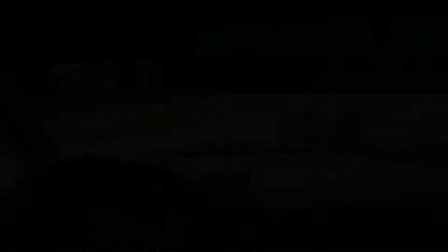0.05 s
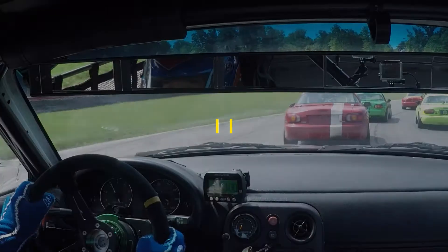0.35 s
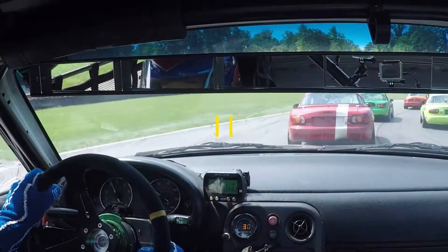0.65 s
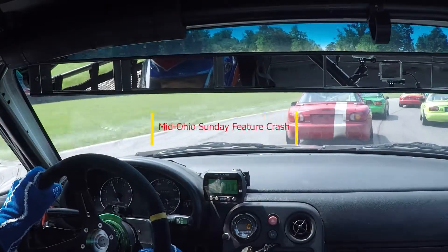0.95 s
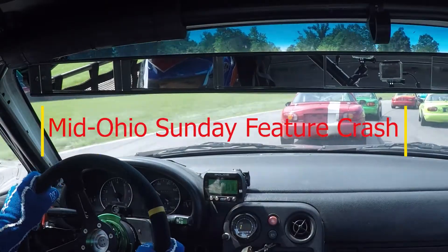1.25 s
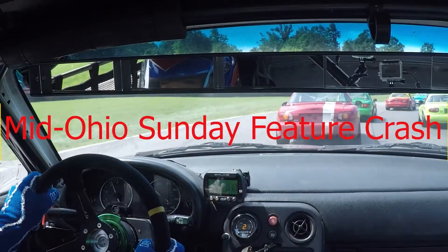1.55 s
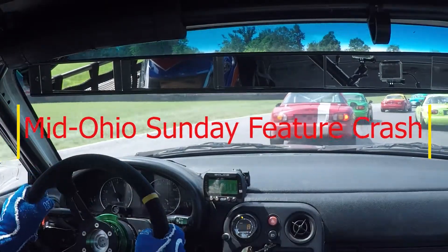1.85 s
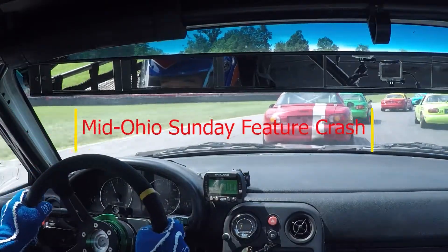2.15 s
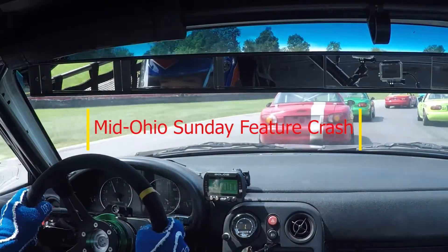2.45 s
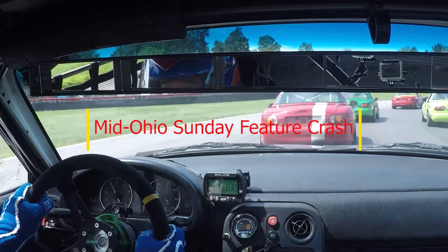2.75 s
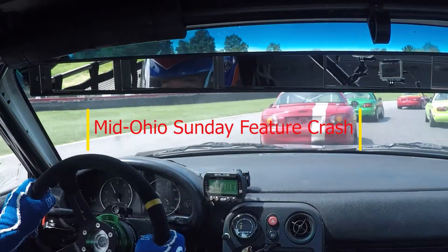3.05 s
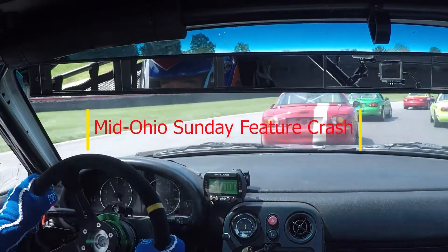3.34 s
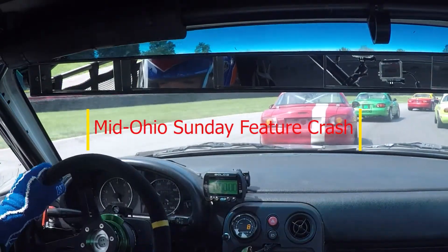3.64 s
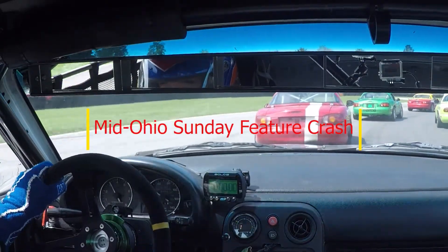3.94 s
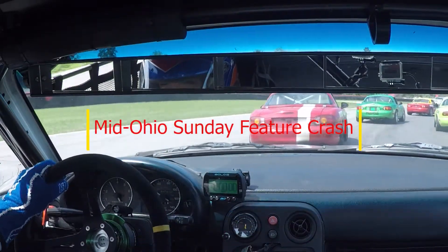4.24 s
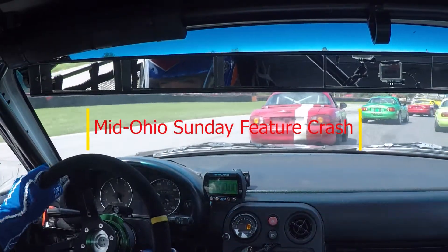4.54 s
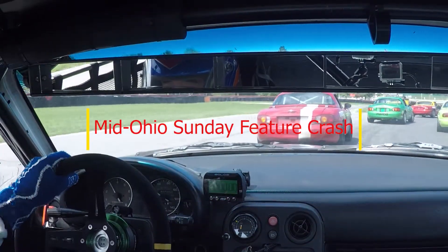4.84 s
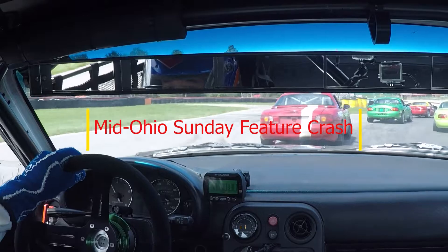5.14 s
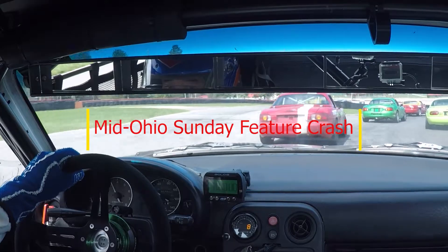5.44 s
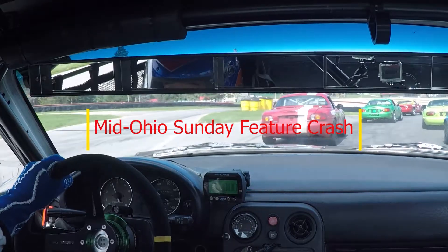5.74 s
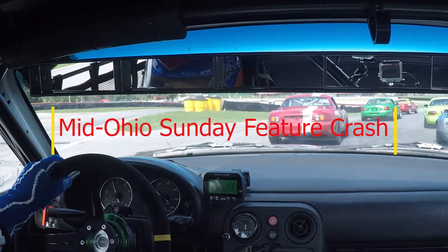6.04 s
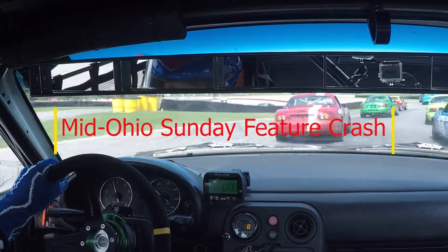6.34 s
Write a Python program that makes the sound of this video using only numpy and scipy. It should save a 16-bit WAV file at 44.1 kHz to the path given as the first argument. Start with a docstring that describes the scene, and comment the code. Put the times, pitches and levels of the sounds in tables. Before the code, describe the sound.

A four-cylinder race car engine fades in, heard from behind the driver in an open cabin. It pulls steadily, eases off, wavers through short presses of the throttle, then pulls again with slowly rising revs. The body drones and the drivetrain whines under tyre roar and low wind buffeting. Another car's engine sounds close by, a panel rasps faintly, and one sharp click comes near the end.

```python
"""A four-cylinder race car engine, heard from the cockpit while running through a bend in a pack.
Its firings make the exhaust pipe ring as it pulls, eases off, then pulls again with wavering revs.
The body drones and the drivetrain whines with the road speed, thin gear tones come and go,
and a rival's engine sings close by. Tyres roar, wind buffets the open cabin, and loose parts rattle."""
import sys
import numpy as np
from scipy import signal
from scipy.fft import rfft, irfft, next_fast_len
from scipy.io import wavfile

SR = 44100
rng = np.random.default_rng(int(sys.argv[2]) if len(sys.argv) > 2 else 0)


def to_wav(sig):
    """Store sig (one row per channel, or 1-D mono) as 16-bit WAV at the path in sys.argv[1].

    Samples outside -1..1 are clipped; the rate is SR.
    """
    pcm = np.clip(np.atleast_2d(sig), -1, 1) * 32767
    pcm = np.round(pcm).astype(np.int16)
    wavfile.write(sys.argv[1], SR, pcm.T)  # frames by channels


N = 290619
TIME = np.arange(N) / SR

# how the cabin colours road noise and drone: (frequency [Hz], relative level [dB])
CABIN_SPECTRUM = [(130, -30), (195, -14.5), (265, -3), (305, -12), (350, -11.5), (400, -4), (455, -1),
                  (520, -3), (610, -1), (750, -10), (860, -11), (950, -30), (1400, -31)]
# machinery as heard in the cabin: (frequency [Hz], relative level [dB])
WHIRR_SPECTRUM = [(700, -17.5), (950, 4.5), (1150, 3.5), (1400, 0), (1570, -1), (1850, -4), (2020, -6.5),
                  (2200, -7.5), (2400, -7), (2750, -12), (3200, -23.5), (4200, -32)]
GEAR_ATTACK_S, GEAR_RELEASE_S = .14, .11


def from_db(db):
    """Turn decibels into a gain to multiply by."""
    return 10 ** (np.asarray(db) / 20)


def rms_one(x):
    """Scale a signal to an average strength (rms) of one."""
    return x / np.sqrt(np.mean(x ** 2) + 1e-20)


def in_time(rows):
    """Join a table's points with lines: one curve for each column after the time."""
    times, *columns = np.transpose(rows)
    return [np.interp(TIME, times, column) for column in columns]


def drift(rate):
    """Smooth random wandering of about size one; a higher rate wanders faster."""
    pole = np.exp(-80 * np.pi * rate / SR)
    noise = rng.standard_normal(N // 40 + 2002)
    slow = signal.lfilter([1], [1, -2 * pole, pole * pole], noise)[2000:]
    return np.interp(np.arange(N) / 40, np.arange(len(slow)), rms_one(slow))


def colour(x, spectrum):
    """Filter a sound by a spectrum that falls away beyond its ends; rms one."""
    hz, db = np.transpose(spectrum)
    size = next_fast_len(N)
    bins_hz = np.maximum(np.fft.rfftfreq(size, 1 / SR), 1)
    gain = from_db(np.interp(np.log(bins_hz), np.log(hz), db))
    gain *= np.minimum(bins_hz / hz[0], 1) ** 2 * np.minimum(hz[-1] / bins_hz, 1) ** 2
    return rms_one(irfft(rfft(x, size) * gain, size)[:N])


def turning(hz, jitter):
    """Count the cycles of a slightly unsteady rotation."""
    return np.cumsum(hz * (1 + jitter * drift(27.7))) / SR


def partial(cycles, order, db, waver_db, lag=0):
    """One tone of wavering level; its 'order' is how often it vibrates in each cycle."""
    return np.sqrt(2) * from_db(db + waver_db * drift(10.5)) * np.cos(2 * np.pi * (order * cycles - lag))


def hum(cycles, level_db, orders, waver_db):
    """A stack of tones whose balance keeps shifting."""
    return sum(partial(cycles, k, level_db + db, waver_db, lag=rng.random()) for k, db in orders)


def spell(start, end, attack_s, release_s):
    """A gain that rises to one, holds until the end time, then falls away."""
    return np.clip((TIME - start) / attack_s, 0, 1) - np.clip((TIME - end) / release_s, 0, 1)


def bursts(rows, attack_s, release_s):
    """Several spells, each at its own level."""
    return sum(from_db(db) * spell(start, end, attack_s, release_s) for start, end, db in rows)


def clatter(cycles, size=512):
    """Meshing parts repeat a rough pattern every four cycles; three such patterns take turns."""
    place = cycles / 4 % 1 * size
    grid = np.arange(size * 8) / 8
    orders = np.arange(size // 2)
    out = 0
    for k in range(3):
        # some tones stand out, mostly even-numbered ones; the highest die away
        strength = from_db(8 * np.clip(rng.standard_normal(len(orders)), -2, 1.4) - 4 * (orders % 2))
        strength *= np.clip((orders[-1] - orders) / (size / 6), 0, 1)
        pattern = irfft(strength * np.exp(2j * np.pi * rng.random(len(orders))), len(grid))
        turn = np.cos(2 * np.pi * (.4 * TIME + k / 3))
        out += np.interp(place, grid, pattern, period=size) * (1 + 0.36 * drift(4)) * turn
    return rms_one(out)


def pulsing_noise(firings, depth):
    """Churning air that swells with each firing."""
    return rms_one(rng.standard_normal(N) * (1 + depth * np.cos(2 * np.pi * firings)))


def cabin_echoes(x, decay_s=.07, share=.35):
    """Add dense, short echoes off bare metal and glass; rms one."""
    age = TIME[:int(decay_s * SR)]
    echoes = rng.standard_normal(len(age)) * from_db(-60 * age / decay_s)
    reflected = rms_one(signal.fftconvolve(x, echoes)[:N])
    return rms_one(np.sqrt(1 - share) * x + np.sqrt(share) * reflected)


def engine(firings, firing_hz):
    """The throttle sets the exhaust's strength; tones swell as the revs carry them through resonances."""
    # presses of the pedal: (start [s], end [s], opening [1 = wide open], brightness [dB per order],
    # time to open [s], time to close [s])
    pulls = [(0, 1.545, .97, 0, .05, .025), (2.2, 2.65, .5, 0, .12, .15), (3.06, 3.52, 1.08, .5, .1, .14),
             (3.9, 4.35, .62, -3, .25, .12), (4.35, 6.3, .95, .1, .12, .25)]
    # resonances of pipe and cabin: (frequency [Hz], level [dB])
    pipe = [(405, -43), (425, -35), (450, -30.5), (500, -42.5), (565, -37), (605, -37), (660, -38),
            (705, -41.5), (755, -37), (810, -38.5), (870, -42.5), (915, -48.5), (975, -52), (1055, -48.5),
            (1150, -53)]
    # exhaust tones; unequal cylinders add the half orders: (order, relative level [dB])
    exhaust_orders = [(1, -5), (2, -5), (3, 0), (3.5, -9), (4, .5), (4.5, -8.5), (5, .5), (5.5, -7), (6, 0),
                      (6.5, -11), (7, -4.5), (8, -7), (9, -16), (10, -16), (11, -10), (12, -15), (13, -16)]
    quarter_orders = [(k, -19) for k in np.arange(3.25, 7, .5)]
    coasting_db = -16.5  # throttle shut, compared with wide open
    throttle, tilt_db = 0, 0
    for start, end, opening, brightness_db, open_s, close_s in pulls:
        pedal = spell(start, end, open_s, close_s)
        throttle += opening * pedal
        tilt_db += brightness_db * pedal
    pipe_hz, pipe_db = np.transpose(pipe)
    out = 0
    for k, db in exhaust_orders + quarter_orders:
        level_db = db + np.interp(k * firing_hz, pipe_hz, pipe_db) + coasting_db * (1 - throttle)
        level_db += tilt_db * (np.clip(k, 3, 6) - 4.5)
        # the pipe delays high tones a little, so each bark rings on
        lag = rng.random() if k % 1 else 0.0306 * k * k
        out += partial(firings, k, level_db, waver_db=1.6, lag=lag)
    return out * (1 + 0.023 * drift(53))  # no two firings are equally strong


def drone():
    """The body booms with the road speed; its overtones swell as they cross the cabin's resonances."""
    # the deep boom: (time [s], pitch [Hz], relative level [dB])
    boom = [(0.1, 105.7, -35), (0.7, 108.6, -29.5), (1.3, 108.8, -30), (1.95, 111.7, -28.5),
            (2.5, 108.4, -26.5), (2.9, 104.5, -28.5), (3.28, 103.4, -29.5), (3.45, 105.4, -38),
            (3.8, 103.7, -32.5), (4.02, 100.5, -45), (4.25, 101.4, -32), (4.9, 103.3, -30.5),
            (5.35, 107.8, -27.5), (5.75, 110.8, -25.5), (6.59, 123.3, -28)]
    # its overtones: (order, relative level [dB])
    overtones = [(2, -14.5), (3, -9.5), (4, -17.5), (5, -15.5), (6, -19), (7, -21)]
    hz, level_db = in_time(boom)
    cycles = turning(hz, jitter=0.0027)
    cabin_hz, cabin_db = np.transpose(CABIN_SPECTRUM)
    out = partial(cycles, 1, level_db + 0.39, waver_db=0.96)
    for k, db in overtones:
        resonance_db = np.interp(k * hz, cabin_hz, cabin_db)
        out += partial(cycles, k, level_db + db + resonance_db, waver_db=2.5, lag=rng.random())
    return out


def drivetrain_whine(shaft, second_db, fourth_db):
    """The spinning drivetrain whines; its fourth tone swells and fades separately."""
    # the other tones: (order, level compared with order 2 [dB])
    tones = [(1, -14.5), (2, 0), (3, -7.5), (5, -9)]
    return hum(shaft, second_db, tones, waver_db=1.0) + partial(shaft, 4, fourth_db, waver_db=2.5)


def rival():
    """The exhaust of another four-cylinder car a few lengths away."""
    # its engine: (time [s], firing rate [Hz], relative level [dB])
    rival_revs = [(0.45, 158, -54), (0.64, 157.2, -43), (0.78, 149.1, -41), (0.92, 156.2, -43),
                  (1.3, 155.6, -49), (2.1, 151.2, -53), (2.6, 153.2, -43.5), (3.0, 151.5, -46),
                  (3.7, 146.7, -52.5), (4.1, 148.8, -41), (4.33, 151.7, -41), (4.9, 161.2, -39.5),
                  (5.3, 169.9, -45.5), (5.6, 160.7, -49.5), (5.9, 157.2, -40), (6.1, 160.4, -40.5),
                  (6.28, 157.5, -40.5), (6.59, 168.5, -46)]
    # its exhaust tones: (order, relative level [dB])
    tones = [(1, -4), (2, -6), (2.5, -12.5), (3, 1), (4, 4.3), (4.5, -11), (5, -7.5)]
    hz, level_db = in_time(rival_revs)
    return hum(turning(hz, jitter=0.003), level_db - .3, tones, waver_db=1.5)


def casing_ring(shaft, hiss_db, above_hiss_db=5, width_hz=24):
    """Clatter and churning air set the gear casings ringing."""
    # narrow resonances of the casings: (frequency [Hz], relative level [dB])
    resonances = [(1570, 0.5), (1795, -1), (2365, -4), (2620, -8), (2960, -10), (3400, -9.5), (3850, -20),
                  (4280, -20.5), (4680, -15.5)]
    gain = from_db(hiss_db + above_hiss_db + 2 * drift(1.8))
    shaking = clatter(shaft) + 0.57 * rng.standard_normal(N)
    ring = 0
    for k, (hz, db) in enumerate(resonances):
        peak_filter = signal.iirpeak(hz, hz / width_hz, SR)
        ring += (-1) ** k * from_db(db) * signal.lfilter(*peak_filter, shaking)
    return gain * rms_one(ring)


def machinery(shaft, firings, spectrum, clatter_share, depth, flutter_db):
    """Repeating clatter mixes with pulsing air into a fluttering whirr."""
    mix = np.sqrt(clatter_share) * clatter(shaft)
    mix += np.sqrt(1 - clatter_share) * pulsing_noise(firings, depth)
    return colour(mix, spectrum) * from_db(flutter_db * drift(7))


def gear_hiss(shaft, firings, level_db):
    """The high part of the machinery's noise echoes around the cabin."""
    # the hiss: (frequency [Hz], relative level [dB])
    band = [(2200, -20.5), (3300, -1.5), (4100, -3), (4750, -1.5), (5600, 0.5), (6500, -7.5), (7400, -11),
            (8500, -25)]
    hiss = machinery(shaft, firings, band, clatter_share=.3, depth=.15, flutter_db=1.16)
    return from_db(level_db) * cabin_echoes(hiss)


def air_hiss(firings, level_db):
    """Churning air adds a flickering hiss at the very top."""
    # the highest treble: (frequency [Hz], relative level [dB])
    band = [(6500, -10.5), (7600, 0), (8700, 1), (9700, -2.5), (12000, 1), (14500, -5), (16000, -13.5)]
    gain = from_db(level_db + 1.1 * drift(12))
    return gain * cabin_echoes(colour(pulsing_noise(firings, depth=.15), band))


def tyre_roar(firings, level_db):
    """Tyres roar on the road, with two short surges."""
    # surges of the roar: (start [s], end [s], level [dB])
    surges = [(1.57, 1.62, -42.5), (1.98, 2.02, -42)]
    gain = from_db(level_db) + bursts(surges, attack_s=0.014, release_s=0.016)
    return gain * colour(pulsing_noise(firings, depth=0.36), CABIN_SPECTRUM)


def wind_buffet(level_db):
    """Wind beats on the open cabin with a low rumble."""
    # the rumble: (frequency [Hz], relative level [dB])
    band = [(15, -11), (27, -1), (40, 3.5), (60, -8.5), (80, -10.5), (125, -12.5), (155, -8.5),
            (185, -34.5), (260, -40)]
    return from_db(level_db) * colour(rng.standard_normal(N), band)


def panel_rasp(firings):
    """A panel rasps as the engine shakes it."""
    # spells of rasping: (start [s], end [s], level [dB])
    rasps = [(.5, .8, -64.5), (1.06, 1.33, -54.5), (1.33, 1.52, -58), (2.72, 3.08, -63), (3.7, 4.02, -63)]
    # the panel's tone: (frequency [Hz], relative level [dB])
    band = [(2100, -29), (2370, 8), (2560, 2), (2750, -16), (4300, -23), (4700, -12), (5200, -27)]
    return bursts(rasps, attack_s=0.078, release_s=0.026) * colour(clatter(firings), band)


def rattles(decay_s=0.0024):
    """Something loose taps lightly; each tap is a puff of noise that dies at once."""
    # the taps: (time [s], starting level [dB])
    taps = [(0.858, -42), (4.9365, -42)]
    gain = sum(from_db(db) * (TIME >= s) * np.exp(-np.abs(TIME - s) / decay_s) for s, db in taps)
    return gain * colour(rng.standard_normal(N), WHIRR_SPECTRUM)


def gear_whines(shaft):
    """Thin gear tones glide with the shaft, each swelling and dying in its turn."""
    # single tones: (start [s], end [s], order of the shaft, level [dB])
    tones = [(1.53, 2.9, 10.11, -65), (1.547, 2.15, 13.9, -67), (1.848, 2.25, 16.7, -67),
             (1.55, 3.0, 19.92, -74), (1.55, 2.25, 22.55, -74.5), (1.55, 2.3, 22.95, -74),
             (1.5, 2.25, 25.56, -76), (1.55, 2.3, 31.54, -75), (1.6, 2.3, 33.7, -78),
             (2.2, 2.45, 26.92, -74), (2.28, 3.05, 12.13, -63), (2.65, 3.1, 16, -67),
             (2.6, 3.0, 26.08, -72), (2.7, 3.1, 20.92, -73), (2.6, 3.05, 23.05, -71), (2.7, 3.0, 31.1, -75),
             (2.8, 3.05, 34.15, -74), (3.02, 3.45, 14.9, -65), (3.55, 4.1, 16.72, -65.5),
             (3.52, 4.05, 18.72, -69), (3.72, 4.05, 8.42, -56), (3.7, 4.08, 39.25, -74),
             (4.55, 5.0, 37.25, -77), (5.4, 5.85, 30.35, -75), (5.62, 5.88, 25.48, -72),
             (6.38, 6.59, 9.66, -53)]
    return sum(spell(start, end, GEAR_ATTACK_S, GEAR_RELEASE_S) * partial(shaft, order, db, waver_db=2.5)
               for start, end, order, db in tones)


def singing_teeth(shaft):
    """The gear teeth sing in many fine tones at once."""
    # spells of singing: (start [s], end [s], level [dB])
    songs = [(1.5, 3.05, -70), (4.7, 5.5, -72), (5.5, 6.5, -69)]
    # their tone: (frequency [Hz], relative level [dB])
    band = [(2500, -13), (2950, 0.5), (3450, -0.5), (3900, -1.5), (4150, -6), (4700, -6), (5100, -7),
            (5700, -8), (6300, -25)]
    return bursts(songs, GEAR_ATTACK_S, GEAR_RELEASE_S) * colour(clatter(shaft), band)


def sharp_click(click_decay_s=.004, thump_db=11, thump_hz=149.9, thump_decay_s=0.0064):
    """One sharp click with a short, low thump under it."""
    # the click: (time [s], peak level [dB])
    clicks = [(5.4232, -28.5)]
    (start, db), = clicks
    age = np.maximum(TIME - start, 0)
    click = (TIME >= start) * np.exp(-age / click_decay_s)
    thump = from_db(thump_db) * np.sin(2 * np.pi * thump_hz * age) * np.exp(-age / thump_decay_s)
    return from_db(db) * (click + thump)


def scene():
    """Engines, drivetrain, road and wind, heard from one spot behind the driver."""
    # engine speed: (time [s], firing rate [Hz])
    revs = [(0.1, 132.8), (0.28, 138.1), (0.43, 138.9), (0.58, 141.5), (0.78, 142), (1.17, 148),
            (1.57, 151.9), (1.97, 145.6), (2.25, 153.2), (2.47, 142.4), (2.62, 151), (2.8, 140.7),
            (3.06, 139.6), (3.17, 146.8), (3.3, 138), (3.45, 145.2), (3.62, 140.2), (4.15, 140.7),
            (4.36, 143), (4.48, 137), (4.6, 143.1), (4.78, 142.4), (5.43, 155.4), (5.53, 156.4),
            (5.65, 162.8), (5.79, 157.7), (5.96, 165.8), (6.59, 170.4)]
    # drivetrain whine: (time [s], shaft rate [Hz], level of order 2 [dB], level of order 4 [dB])
    drivetrain = [(0.1, 140, -42, -41), (0.9, 147.5, -41.5, -41), (1.5, 147.3, -48.5, -45),
                  (2.0, 148.2, -46, -49.5), (2.45, 150.1, -54, -49), (3.0, 146.2, -48, -54),
                  (3.15, 145, -43, -44), (3.72, 140.4, -30.5, -37), (4.05, 141.1, -31.5, -34),
                  (4.3, 142.5, -35.5, -30.5), (4.55, 143.2, -36, -35.5), (4.9, 142.5, -37, -38),
                  (5.4, 147.3, -41, -40), (5.8, 151.8, -43, -41), (6.15, 156.3, -47, -41),
                  (6.59, 165.8, -35, -41)]
    # rushing noises: (time [s], wind level [dB], tyre level [dB], whirr level [dB])
    rush = [(.3, -35, -42, -55.5), (.65, -31, -39.5, -54), (1.1, -34, -45, -51), (1.5, -33, -47.5, -52),
            (1.65, -37, -41, -56.5), (2.0, -32.5, -36, -51.5), (2.75, -37, -38, -51.5),
            (3.15, -30.5, -38, -51), (3.45, -32.5, -41.5, -55), (3.75, -30.5, -34.5, -50.5),
            (4.4, -32.5, -39, -51), (5.2, -35.5, -40.5, -51.5), (5.7, -39.5, -37.5, -49),
            (6.15, -40.5, -39.5, -50), (6.59, -31, -32, -46)]
    # high noises: (time [s], gear hiss level [dB], air hiss level [dB])
    treble = [(0.36, -71, -82.5), (0.63, -67, -78.5), (1.0, -70.5, -82), (1.17, -68.5, -79),
              (1.58, -70.5, -81), (1.91, -66.5, -77), (2.69, -65, -74.5), (3.1, -64, -73),
              (3.19, -69, -82.5), (3.6, -67, -78.5), (3.7, -65.5, -75), (4.12, -64.5, -74),
              (4.45, -68, -78), (5.7, -65, -75.5), (6.07, -66, -76), (6.55, -62, -73.5)]
    firing_hz, = in_time(revs)
    shaft_hz, second_db, fourth_db = in_time(drivetrain)
    wind_db, tyre_db, whirr_db = in_time(rush)
    hiss_db, air_db = in_time(treble)
    firings = turning(firing_hz, jitter=0.0023)
    shaft = turning(shaft_hz, jitter=0.0007)
    mix = engine(firings, firing_hz) + drone() + drivetrain_whine(shaft, second_db, fourth_db) + rival()
    mix += casing_ring(shaft, hiss_db)
    whirr = machinery(shaft, firings, WHIRR_SPECTRUM, clatter_share=0.28, depth=0.3, flutter_db=0.7)
    mix += from_db(whirr_db) * whirr + gear_hiss(shaft, firings, hiss_db)
    mix += air_hiss(firings, air_db) + tyre_roar(firings, tyre_db) + wind_buffet(wind_db)
    mix += panel_rasp(firings) + rattles() + gear_whines(shaft) + singing_teeth(shaft) + sharp_click()
    return mix[None]


def record(dry):
    """Fade the sound in and cut the very highest treble."""
    start_s, fade_s, cutoff_hz = 0.11, 0.24, 16400
    fade = np.clip((TIME - start_s) / fade_s, 0, 1) ** 0.97
    return signal.sosfilt(signal.cheby2(12, 70, cutoff_hz, fs=SR, output="sos"), dry * fade)


dry = scene()
out = record(dry)
to_wav(out)
```